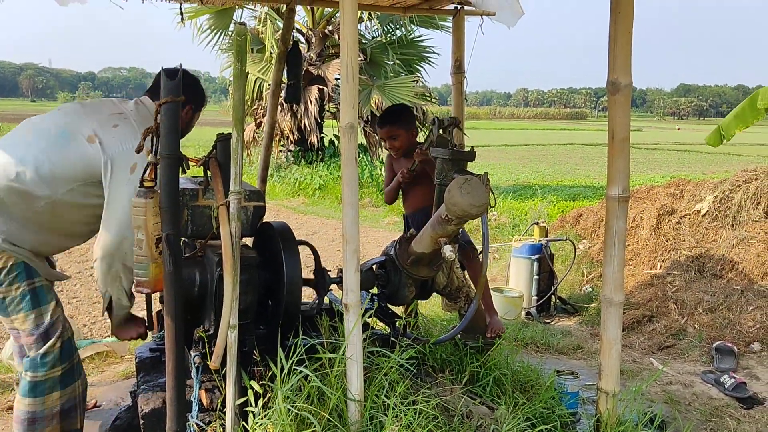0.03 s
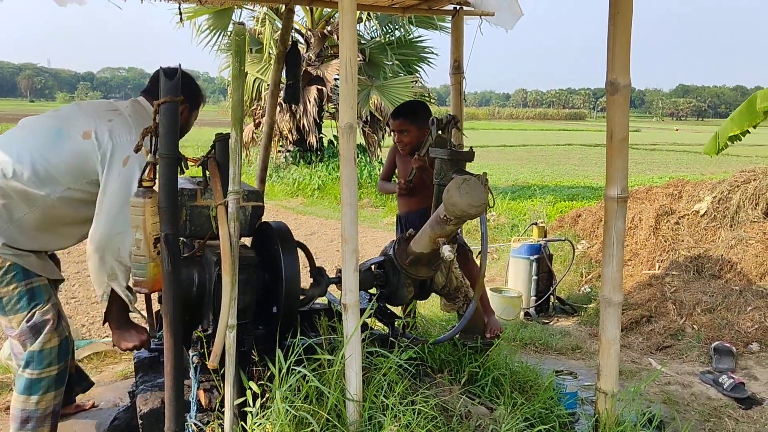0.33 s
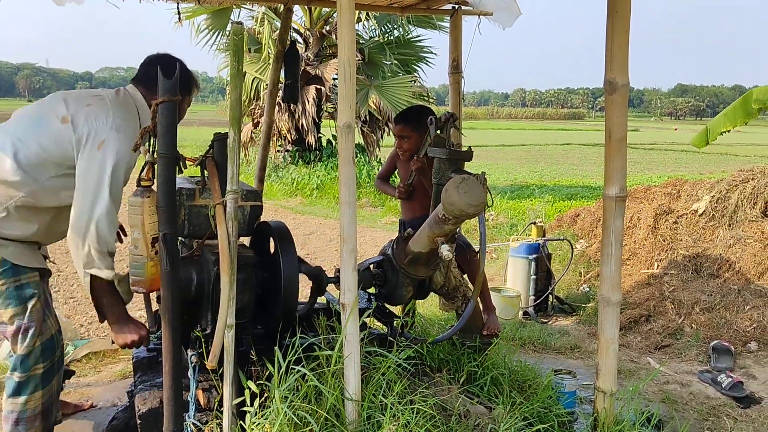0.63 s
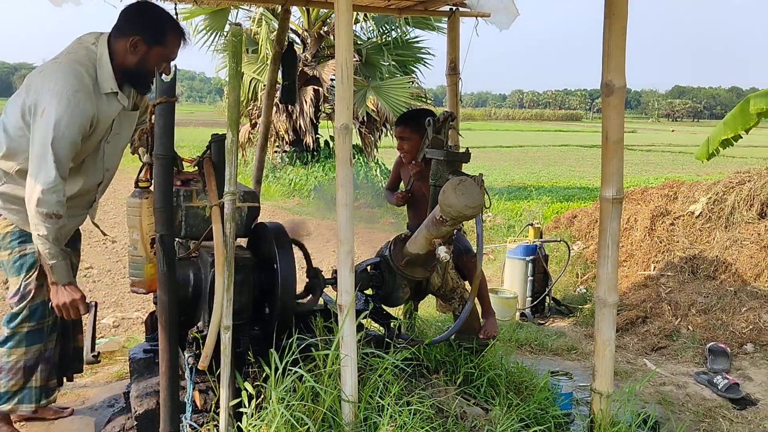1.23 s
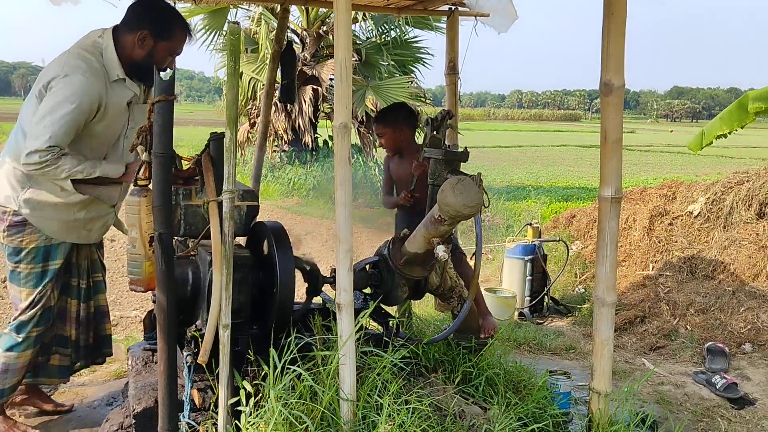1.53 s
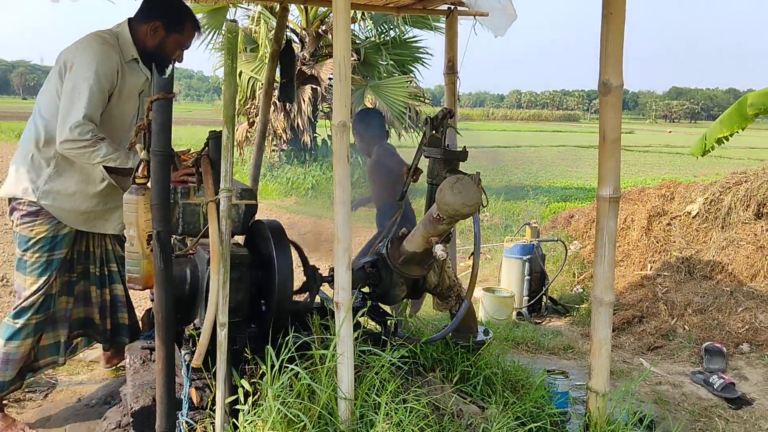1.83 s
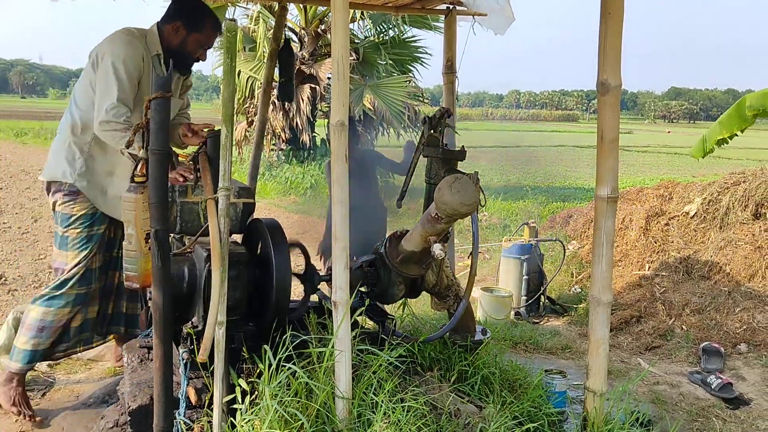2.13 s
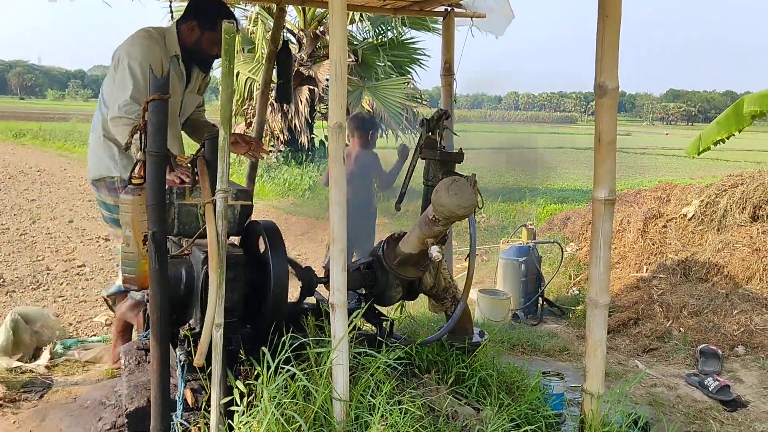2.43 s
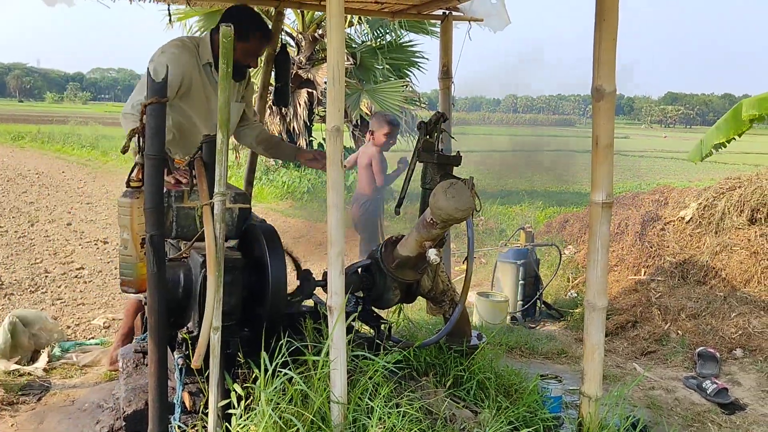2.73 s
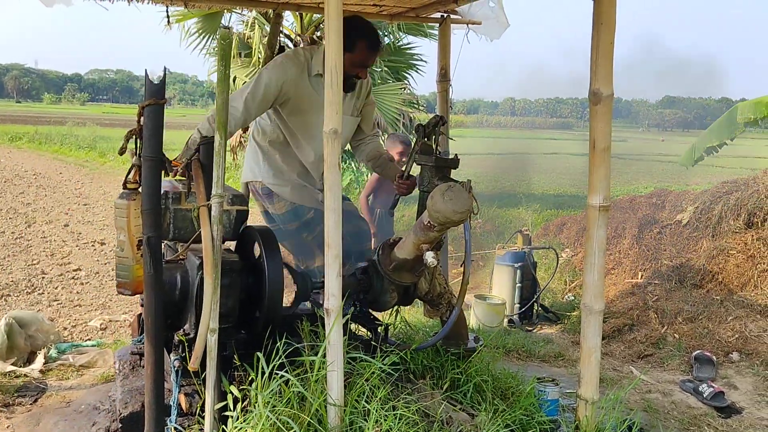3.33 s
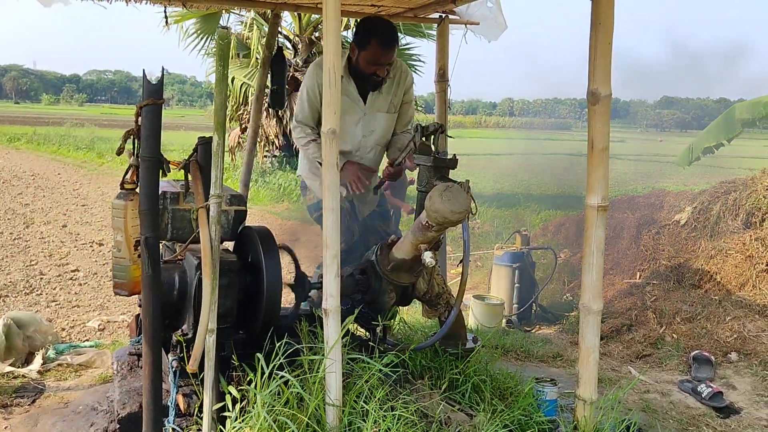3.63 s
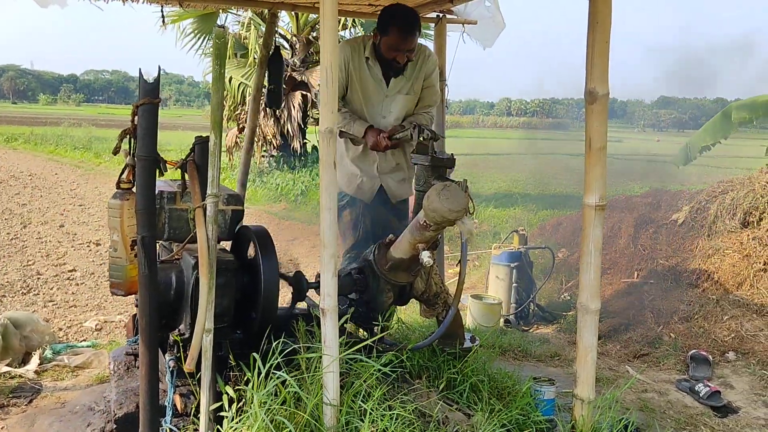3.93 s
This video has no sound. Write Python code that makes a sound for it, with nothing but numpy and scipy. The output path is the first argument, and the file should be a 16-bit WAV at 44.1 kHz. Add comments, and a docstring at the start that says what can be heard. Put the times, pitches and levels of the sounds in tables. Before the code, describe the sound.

An old single-cylinder pump engine starts under an open field shelter. At first the crank rubs faintly, with one short falling groan, while wind buffets the microphone, mostly left. From 0.8 seconds the engine fires sharp, hissing exhaust bangs, with heavy iron knocks until about 2 seconds. The bangs keep quickening into a rapid, lightly rattling chug, and a gear whirr and whine grow from 2.5 to 4 seconds.

```python
"""An old single-cylinder pump engine is hand-cranked, catches with heavy knocks and speeds up to a chug.
Each valve opening releases a hissing jet, a low bark and a pressure pulse; gas in the cylinder rings.
Knocks shake the block and ring the iron, the linkage clacks, the gears whirr and whine.
An open shelter in a field reflects the bangs and knocks. Wind buffets the microphone, mostly left."""
import sys
import numpy as np
from scipy import signal
from scipy.fft import rfft, irfft
from scipy.io import wavfile
from scipy.ndimage import uniform_filter1d

SR = 44100
rng = np.random.default_rng(int(sys.argv[2]) if len(sys.argv) > 2 else 0)


def master(y):
    """Save y as 16-bit WAV."""
    cut = np.clip(np.atleast_2d(y).T, -1, 1)
    pcm = np.round(cut * 32767)  # scale
    wavfile.write(sys.argv[1], SR, pcm.astype(np.int16))


N = 176400
TIME_S = np.arange(N) / SR

# Exhaust bangs. Each row: start in seconds, then jet, bark and pipe note in relative dB.
BANGS = [(.815, 2, -3, 0), (1.031, 2, -4.5, 4.5), (1.219, -0.5, -6.5, 2.5), (1.387, 1, -4, 2.5),
         (1.541, 1.5, -3, 4), (1.683, -0.5, -1, 4.5), (1.816, 0, -2.5, 3.5), (1.942, 0.5, 1.5, 3.5),
         (2.061, 0.5, 0.5, 2.5), (2.175, 0, -1.5, 3.5), (2.283, -0.5, -0.5, 3), (2.387, 0.5, 0.5, 2),
         (2.488, 0, 1.5, -0.5), (2.585, 0, 3, -5), (2.680, -0.5, 4, -5), (2.772, -0.5, 3, 3),
         (2.86, 0.5, 4.5, 0), (2.946, -0.5, 2.5, -1), (3.031, 0, 2.5, 3), (3.113, -0.5, 5.5, -2),
         (3.194, -0.5, 3.5, 1), (3.272, -0.5, 2.5, -12), (3.350, -0.5, 2, 1.5), (3.426, 0, 3.5, 5),
         (3.5, 0, 5, 5), (3.574, -1, 1.5, 0), (3.646, -1, 0, 4), (3.716, 0.5, 1.5, 0.5),
         (3.787, -0.5, 2.5, 1), (3.855, 0, 5.5, 4), (3.922, -0.5, 3, 6.5), (3.989, -2, 2, 3)]
BANG_S = np.array(BANGS)[:, 0]
PERIODS_S = np.append(np.diff(BANG_S), BANG_S[-1] - BANG_S[-2])
# Gas spits. Each row: start in seconds, level in relative dB, hold in seconds.
SPITS = [(0.929, -18, .006), (1.6, -1.5, 0.011)]
# Exhaust puffs reaching the microphone. Each row: start in seconds, level in relative dB.
PUFFS = [(1.684, 0.5), (2.06, -2), (2.59, -19), (2.682, 1.5), (2.777, 4.5), (2.865, -13), (2.95, -1),
         (3.125, -8.5), (3.359, -2), (3.434, -3), (3.66, -15), (3.868, -1), (3.93, -4.5)]
# Low thuds like wind buffets, then firing knocks.
# Each row: start in seconds, then clank and thud in relative dB.
KNOCKS = [(0.098, -20, 1), (.172, -22, 2), (.347, -19, 2.5), (0.653, -22.5, -2), (0.686, -24, 4),
          (.753, -30, 0), (0.787, -1, -3.5), (.966, -13, 5), (0.986, -7, -7), (0.998, -5.5, -1),
          (1.010, -3.5, 1), (1.018, -31, -13), (1.148, -10, -1), (1.182, -3, -1), (1.194, -5, -1),
          (1.203, -5, -1.5), (1.328, -29, 1.5), (1.355, -2, -2.5), (1.365, -4.5, 1), (1.373, -23, -7),
          (1.495, -33, -6), (1.51, 1.5, -3), (1.521, -7, -4), (1.529, -17, -8.5), (1.658, -8, -27),
          (1.789, -11, -7), (1.921, -10, -14), (1.926, -16, -2)]
# Iron clacks. Each row: start in seconds, then body and ping in relative dB.
CLACKS = [(.7884, -6, 0), (.7945, -1, -12), (.7988, -6, -10), (1.0106, 0.5, 3), (1.0174, -1.5, -13),
          (1.1847, -12, -2), (1.1895, -7, -14), (1.2034, 2, -1), (1.3545, -17, -1.5), (1.361, -12, -14),
          (1.3735, 2.5, -13), (1.511, -8, 2), (1.5162, -13, -12), (1.5235, -5, -16), (1.5311, 3, -14)]
# Crank rubs. Each row: start in seconds, level in dB, hold in seconds.
RUBS = [(0.139, -45, 0.043), (0.193, -35, 0.024), (0.25, -41.5, .035), (0.285, -41, 0.012),
        (0.444, -38, 0.052), (0.513, -40, 0.045), (0.55, -40, .01), (.675, -48, 0.035)]

# Exhaust metal modes. Each row: frequency in Hz, width in Hz, gain in relative dB.
EXHAUST_MODES = [(2664, 30, 3.5), (5950, 81, -5.5), (6420, 55, -13), (7800, 46, -17), (9090, 31, -20)]
# Engine iron modes. Each row: frequency in Hz, level in relative dB, T60 in seconds.
IRON_MODES = [(737, 0, 0.053), (982, -3, 0.12), (1094, -3.5, 0.08), (2510, -6.5, 0.055), (2760, 6, 0.045),
              (3500, -5, 0.043), (6000, -14, 0.039), (6400, 5, 0.058)]
# Clack modes. Each row: mean frequency in Hz, level in relative dB, swell in seconds.
CLACK_BODY_MODES = [(714, -25, .0016), (980, -18, 0.0017), (1340, -28.5, 0.00093)]
CLACK_PING_MODES = [(2140, -29.5, 0.0013), (2770, -26, 0.0014)]
# Tones beside the tooth whine. Each row: offset in beats per engine cycle, level in relative dB.
GEAR_SIDEBANDS = [(-11.5, -16), (6.5, -10)]

# Noise spectra. Each row: frequency in Hz, density in relative dB.
JET_SPECTRUM = [(300, -7), (700, -11.5), (1300, -7.5), (2200, -5), (3200, -1), (4700, -1), (5900, 0),
                (7500, 0.5), (9500, 0), (11500, -4.5), (13500, -8.5), (16000, -8)]
BARK_SPECTRUM = [(30, 2.5), (100, 2), (250, -2), (500, -4), (1000, -6.5), (2000, -6), (4000, -15),
                 (9000, -48)]
CLANK_SPECTRUM = [(100, -26), (350, 13), (550, -6.5), (800, 10.5), (1050, 8.5), (1400, -5.5), (2100, -2.5),
                  (2800, -6.5), (3800, -15), (6000, -15.5), (10000, -23), (16000, -42)]
THUD_SPECTRUM = [(20, 1), (50, -0.5), (100, 4), (200, -5), (350, -11), (600, -37), (2000, -59)]
WHIRR_SPECTRUM = [(50, -4), (200, 6), (400, -1.5), (600, 1.5), (770, 9.5), (1080, 10.5), (1250, -6),
                  (2100, -4.5), (2800, -7), (4000, -11.5), (6000, -7), (9000, -13.5), (16000, -31)]
RUMBLE_SPECTRUM = [(15, -1), (40, 3), (80, 4.5), (140, -11.5), (220, -6), (350, -17), (600, -25),
                   (2000, -58)]
RUB_SPECTRUM = [(700, 3), (1300, 3.5), (2300, 2.5), (3600, 0), (5200, -0.5), (6200, -1), (8000, 0),
                (10500, -7.5), (16000, -15)]
WIND_SPECTRUM = [(10, -4), (35, 0), (90, 1.5), (170, -2), (260, -8), (380, -15), (520, -27.5),
                 (1000, -31.5), (4000, -60)]
# Level curves. Each row: time in seconds, level in relative dB.
WHINE_CURVE = [(0, -55), (2.2, -52), (2.55, -40), (2.8, -42), (3.05, -33), (3.25, -36.5), (3.45, -41),
               (3.7, -41), (3.84, -34), (3.91, -38), (4, -29)]
WHIRR_CURVE = [(0, -39.5), (.75, -40), (.9, -43), (1.5, -42.5), (2.1, -41), (2.6, -38.5), (3.1, -35),
               (3.6, -28.5), (4, -27.5)]
RUMBLE_CURVE = [(0, -37), (1.2, -32.5), (1.7, -35.5), (2.4, -30.5), (3.2, -31.5), (4, -32)]
WIND_CURVE = [(0, -17.5), (.07, -19.5), (.15, -20), (.28, -20), (.355, -16), (.40, -27.5), (.47, -20),
              (.61, -18.5), (.70, -14.5), (.77, -16.5), (.86, -27.5), (1.0, -23), (1.3, -31), (1.7, -39),
              (4, -35.5)]
# Stereo balance of noise. Each row: frequency in Hz, left minus right in dB.
BALANCE = [(100, 5), (400, -2), (2000, 1.5), (3500, -2), (4700, -1), (5600, -9.5), (6800, -6), (8000, -7.5),
           (9400, 6), (11000, 1), (13500, 5), (16000, -13.5)]
# Stereo likeness of noise. Each row: frequency in Hz, left-right correlation.
CORRELATION = [(100, 0.28), (600, 0.52), (1500, 0.085), (5000, 0.014), (16000, 0.041)]


def exhaust():
    """Each valve opening lets out a hissing jet and a low bark; slow cycles open more softly."""
    jet, bark = np.zeros((2, N))
    for (start_s, jet_db, bark_db, _), period_s in zip(BANGS, PERIODS_S):
        jet_shape = burst(attack_s=0.0033 + 0.022 * period_s, hold_s=0.035 - 0.13 * period_s,
                          sag_db=3, t60_s=0.11)
        bark_shape = burst(attack_s=0.045 * period_s, hold_s=0.095 * period_s, sag_db=3, t60_s=0.089)
        add(jet, start_s - 0.001, amp(jet_db) * jet_shape)
        add(bark, start_s, amp(bark_db) * bark_shape)
    for start_s, db, hold_s in SPITS:
        add(jet, start_s, amp(db) * burst(attack_s=0.0066, hold_s=hold_s, sag_db=6.5, t60_s=0.047))
    hiss = jet * patchy(noise(JET_SPECTRUM), depth_db=2) * amp(-13 + 1.1 * wobble(hz=400))
    ring = sum(amp(db + 3.5) * resonate(hiss, hz, width_hz) for hz, width_hz, db in EXHAUST_MODES)
    # The valve gap hisses harder on slow cycles.
    slowness = np.interp(TIME_S, BANG_S, PERIODS_S / PERIODS_S[0])
    gap_hiss = amp(-8.5) * slowness ** 2 * resonate(hiss, hz=6100, width_hz=780)
    return hiss + gap_hiss + ring + bark * noise(BARK_SPECTRUM) * amp(-17 + wobble(hz=250))


def pipe_note():
    """Gas in the open cylinder rings, rising in pitch as the piston sweeps up."""
    base_hz, rise_ratio, sweep_cycles = 89, 4.61, 0.259
    out, t = np.zeros(N), np.arange(SR // 8) / SR
    flutter = wobble(hz=150)
    detunes = 0.074 * rng.standard_normal(len(BANGS))
    for (start_s, _, _, db), period_s, detune in zip(BANGS, PERIODS_S, detunes):
        sweep = np.minimum(t / period_s / sweep_cycles, 2)
        glide = 1 + (rise_ratio - 1) * np.sin(np.pi / 2 * np.minimum(sweep, 1)) ** 2
        jitter = 0.15 * PERIODS_S[-1] / period_s * flutter[round(start_s * SR) // 2:][:len(t)]
        droop = min(period_s / PERIODS_S[11], 1.05) ** 0.57  # fast cycles sound lower
        hz = base_hz * glide * (1 + detune + jitter) * droop
        envelope = amp(-26 + db + 4.3 * sweep - 17.7 * sweep ** 5)
        add(out, start_s, envelope * np.sin(2 * np.pi * np.cumsum(hz) / SR))
    return out * amp(1.9 * wobble(hz=118)) * amp([[0.5], [-0.5]])


def gas_push():
    """The opening valve sends a short pressure pulse; some puffs push slowly on the microphone."""
    pulse_s = 0.01
    phase = np.linspace(0, np.pi, round(pulse_s * SR))
    pulse = np.sin(2 * phase) * np.sin(phase)
    pulses, push = np.zeros(N), np.zeros((2, N))
    for start_s, period_s in zip(BANG_S, PERIODS_S):
        add(pulses, start_s - 0.31 * pulse_s, (PERIODS_S[-1] / period_s) ** 1.2 * pulse)
    puff = burst(attack_s=0.014, hold_s=0.024, sag_db=0.5, t60_s=0.092)
    for start_s, db in PUFFS:
        *sways, polarity = rng.uniform(-0.43, 1, 3)
        for channel, sway in zip(push, sways):
            add(channel, start_s, amp(db) * np.sign(polarity) * (1 + 0.55 * sway) * puff)
    return amp(-15.5) * (pulses + push * (1 + 0.04 * wobble(hz=60)))


def knocks():
    """Combustion shakes the block: heavily at first, later lightly before each bang.
    Low thuds, mostly on the left, sound like wind buffeting the microphone."""
    clank, thud, push = np.zeros((3, N))
    clank_shape = burst(attack_s=0.00098, hold_s=0.0094, sag_db=9, t60_s=0.042)
    thud_shape = burst(attack_s=0.0018, hold_s=0.0069, sag_db=3, t60_s=0.1)
    light_shape = burst(attack_s=0.0013, hold_s=0.018, sag_db=3.5, t60_s=0.035)
    for start_s, clank_db, thud_db in KNOCKS:
        add(clank, start_s, amp(clank_db) * clank_shape)
        add(thud, start_s, amp(thud_db) * thud_shape)
        add(push, start_s, amp(thud_db - 16) * ping(hz=95.5 * rng.uniform(0.74, 1.1), swell_s=0.0032))
    for start_s, period_s in zip(BANG_S, PERIODS_S):
        if start_s > KNOCKS[-1][0] + PERIODS_S[-1]:
            add(clank, start_s - 0.187 * period_s, amp(-13.5) * light_shape)
    clanks = amp(-18) * clank * patchy(noise(CLANK_SPECTRUM), depth_db=1.5)
    thuds = push + amp(-16.5) * thud * noise(THUD_SPECTRUM)
    return clanks + amp([[1], [-5]]) * thuds


def clacks():
    """Piston and loose linkage slam: a hard clack near 1 kHz with a thin ping above it."""
    out = np.zeros((2, N))
    for start_s, body_db, ping_db in CLACKS:
        for channel, tuning in zip(out, 1 + 0.047 * rng.standard_normal(2)):
            for modes, blow_db in [(CLACK_BODY_MODES, body_db), (CLACK_PING_MODES, ping_db)]:
                for hz, db, swell_s in modes:
                    add(channel, start_s, amp(blow_db + db) * ping(hz * tuning, swell_s))
    return out


def rattle():
    """The iron rings at each heavy knock, and at random as the running engine shakes loose parts."""
    hits_per_s, knock_cutoff_hz = 13, 1100
    out, t = np.zeros((2, N)), np.arange(SR // 8) / SR
    for hz, db, t60_s in IRON_MODES:
        shaken = (rng.random(N) < hits_per_s / SR) & (TIME_S > BANG_S[0])
        hits = amp(-40.5) * shaken * rng.uniform(-1.7, 1.65, (2, N))
        knock_gain = amp(-20) / np.hypot(1, (hz / knock_cutoff_hz) ** 2.2)
        for start_s, clank_db, _ in KNOCKS:
            hits[:, round(start_s * SR)] += knock_gain * amp(clank_db) * rng.uniform(-0.8, 1, 2)
        ring = amp(db - 60 * t / t60_s) * np.sin(2 * np.pi * hz * t)
        out += signal.oaconvolve(hits, ring[None], axes=1)[:, :N]
    return out


def gears():
    """The gears rumble and whirr; a tooth whine follows the speed and swells before each bang."""
    teeth_per_cycle = 65
    cycles = np.interp(TIME_S, BANG_S, np.arange(len(BANG_S)))
    cycle_hz = uniform_filter1d(np.interp(TIME_S, BANG_S + PERIODS_S / 2, 1 / PERIODS_S), SR // 5)
    swing = 0.0255 * np.cos(2 * np.pi * cycles)
    jitter = 0.0196 * cycle_hz * PERIODS_S[-1] * wobble(hz=90.5)
    teeth = np.cumsum(teeth_per_cycle * cycle_hz * (1 + swing + jitter)) / SR
    sidebands = sum(amp(db) * np.sin(2 * np.pi * (teeth + beats * cycles))
                    for beats, db in GEAR_SIDEBANDS)
    swell_db = 3.4 * np.cos(2 * np.pi * (cycles + 0.17))
    whine = (np.sin(2 * np.pi * teeth) + sidebands) * amp(swell_db + 1.2 * wobble(hz=50))
    whirr = patchy(noise(WHIRR_SPECTRUM), depth_db=4) * amp(1.6 * wobble(hz=106))
    rumble = noise(RUMBLE_SPECTRUM)
    return level(WHINE_CURVE) * whine + level(WHIRR_CURVE) * whirr + level(RUMBLE_CURVE) * rumble


def crank():
    """The crank hisses in short rubs as it is swung round."""
    envelope = np.zeros(N)
    for start_s, db, hold_s in RUBS:
        add(envelope, start_s, amp(db) * burst(attack_s=0.0071, hold_s=hold_s, sag_db=1.5, t60_s=0.12))
    return envelope * patchy(noise(RUB_SPECTRUM), depth_db=3.5)


def groan():
    """The slowly turning engine gives one short, falling groan."""
    start_s, start_hz, fall_s = 0.48, 403, 0.276
    out = np.zeros(N)
    envelope = burst(attack_s=0.012, hold_s=0.095, sag_db=3, t60_s=0.1)
    hz = start_hz * np.exp(-np.arange(len(envelope)) / SR / fall_s)
    add(out, start_s, envelope * np.sin(2 * np.pi * np.cumsum(hz) / SR))
    return out * amp(-31 + 2 * wobble(hz=60))


def wind():
    """Quick gusts buffet the microphone; the noise is uncorrelated between channels."""
    buffeting = patchy(noise(WIND_SPECTRUM, shared=0), depth_db=2.5, frames=10, bins=2)
    gusts = amp(3.5 * wobble(hz=29.6))
    return level(WIND_CURVE) * buffeting * gusts * amp([[0.5], [-7.5]])


def shelter(x):
    """Adds near reflections from ground and roof, a thin tail and a soft echo from the trees."""
    taps_per_s, tail_t60_s, echo_s = 2000, 0.15, 0.058
    t = np.arange(SR // 3) / SR
    taps = rng.choice([-1., 1.], (2, len(t))) * (rng.random((2, len(t))) < taps_per_s / SR)
    near = np.zeros_like(taps)
    delays = rng.integers(SR // 2000, SR // 100, (2, 8))
    np.put_along_axis(near, delays, rng.choice([-1., 1.], (2, 8)), 1)
    tail = taps * (t > 0.008) * amp(-60 * t / tail_t60_s)
    echo = taps * np.exp(-((t - echo_s) / 0.0029) ** 2)
    paths = [(-8.5, near), (-22, tail), (-22.5, echo)]
    response = sum(amp(db) * path / np.linalg.norm(path[0]) for db, path in paths)
    return x + signal.fftconvolve(x, response, axes=1)[:, :N]


def amp(db):
    """Decibels to gain."""
    return 10 ** (np.asarray(db) / 20)


def unit_rms(x):
    """Scales to rms 1."""
    return x / np.sqrt(np.mean(x ** 2) + 1e-20)


def at_hz(points, hz):
    """Interpolates a table over log frequency."""
    points_hz, values = np.transpose(points)
    return np.interp(np.log(hz + 1), np.log(points_hz + 1), values)


def level(curve):
    """Gain over time from a dB curve."""
    return amp(np.interp(TIME_S, *np.transpose(curve)))


def add(mix, start_s, sound):
    """Mixes a sound in place."""
    part = mix[max(round(start_s * SR), 0):][:len(sound)]
    part += sound[:len(part)]


def noise(spectrum, shared=1):
    """Shaped stereo noise, rms 1; shared scales the left-right correlation."""
    hz = np.fft.rfftfreq(N, 1 / SR)
    left, independent = rfft(rng.standard_normal((2, N)))
    correlation = np.clip(shared * at_hz(CORRELATION, hz), -1, 1)
    right = correlation * left + np.sqrt(1 - correlation ** 2) * independent
    gain = amp(at_hz(spectrum, hz) + np.outer([0.5, -0.5], at_hz(BALANCE, hz)))
    return unit_rms(irfft(np.array([left, right]) * gain, N))


def wobble(hz):
    """Random drift, rms 1, low-passed at hz."""
    rolloff = 1 + (np.fft.rfftfreq(N, 1 / SR) / hz) ** 4
    return unit_rms(irfft(rfft(rng.standard_normal(N)) / rolloff, N))


def patchy(x, depth_db, frames=15, bins=5):
    """Varies the colour in small time-frequency patches; returns rms 1."""
    spectra = signal.stft(x, nperseg=512, noverlap=384)[2]
    field = rng.standard_normal(spectra.shape[1:])
    field = uniform_filter1d(uniform_filter1d(field, frames, axis=1), bins, axis=0)
    spectra *= amp(depth_db * unit_rms(field))
    return unit_rms(signal.istft(spectra, nperseg=512, noverlap=384)[1][:, :N])


def resonate(x, hz, width_hz):
    """Resonance with peak gain 1."""
    carrier = np.exp(2j * np.pi * hz * TIME_S)
    pole = np.exp(-np.pi * width_hz / SR)
    return 2 * (carrier * signal.lfilter([1 - pole], [1, -pole], x / carrier + 1e-18)).real


def burst(attack_s, hold_s, sag_db, t60_s):
    """Envelope: rises, sags over the hold, dies away."""
    t = np.arange(SR // 4) / SR
    fall_db = sag_db * np.minimum(t / hold_s, 1) + 60 * np.maximum(t - hold_s, 0) / t60_s
    return np.minimum(t / attack_s, 1) * amp(-fall_db)


def ping(hz, swell_s):
    """Damped tone whose envelope peaks at swell_s."""
    t = np.arange(SR // 16) / SR
    return t / swell_s * np.exp(1 - t / swell_s) * np.sin(2 * np.pi * hz * t)


def scene():
    """The engine under its shelter, in the wind."""
    bangs = shelter(exhaust() + knocks())
    return bangs + clacks() + crank() + groan() + pipe_note() + gas_push() + gears() + rattle() + wind()


def record(dry):
    """Soft clip, then low-pass."""
    ceiling, cutoff_hz = amp(-6.5), 15800
    lowpass = signal.firwin(511, cutoff_hz, window=("kaiser", 8), fs=SR)
    return signal.oaconvolve(ceiling * np.tanh(dry / ceiling), lowpass[None], "same", axes=1)


dry = scene()
out = record(dry)
master(out)
```